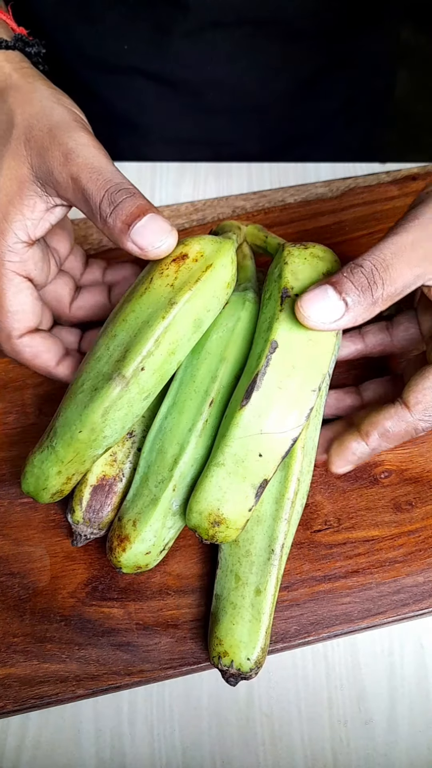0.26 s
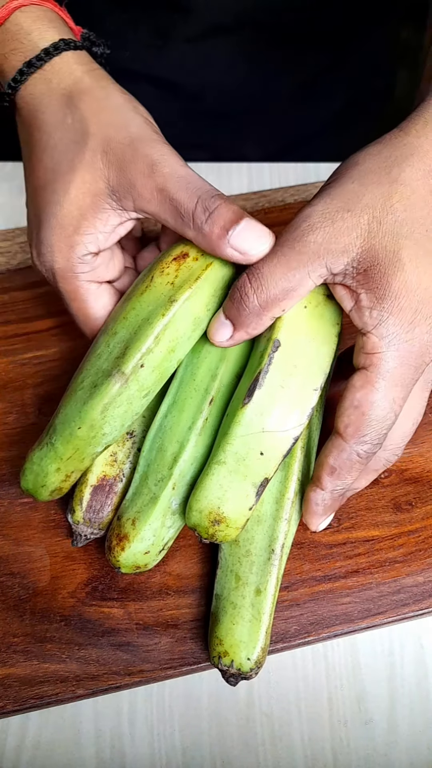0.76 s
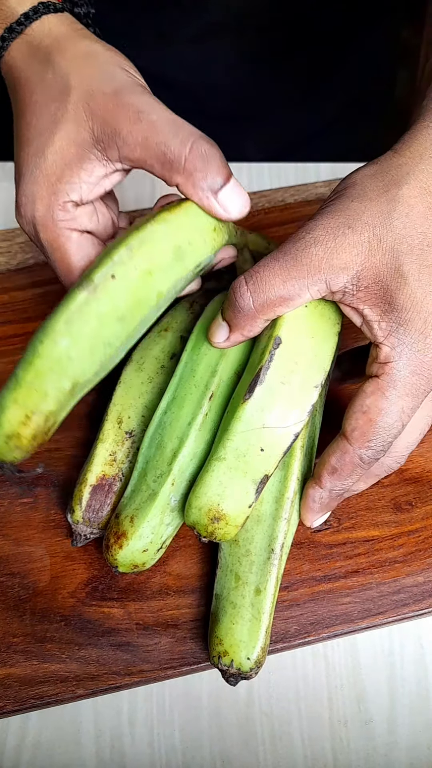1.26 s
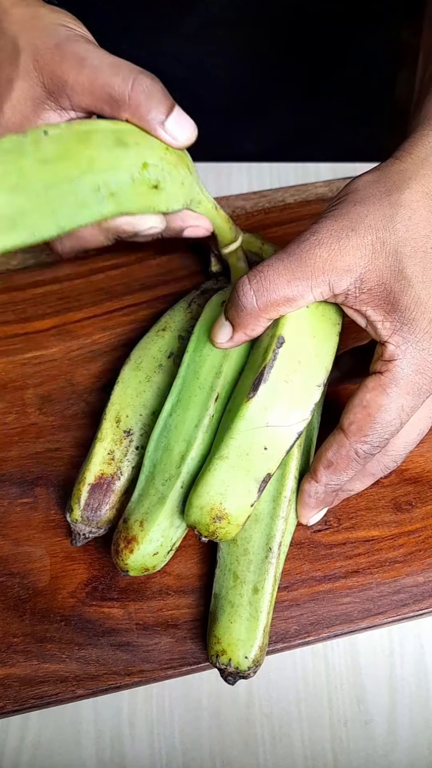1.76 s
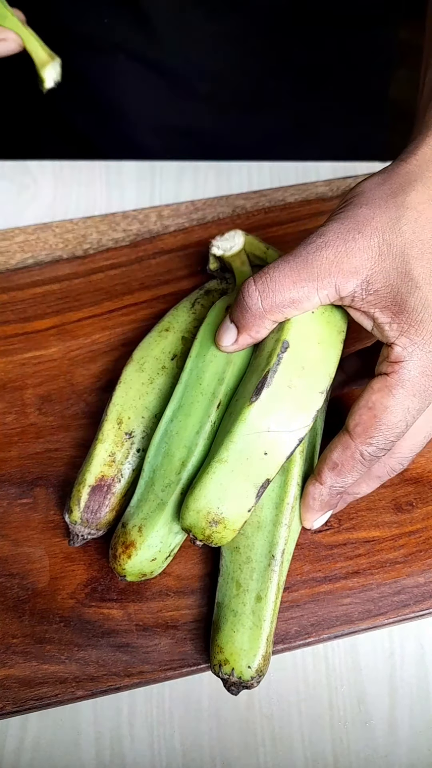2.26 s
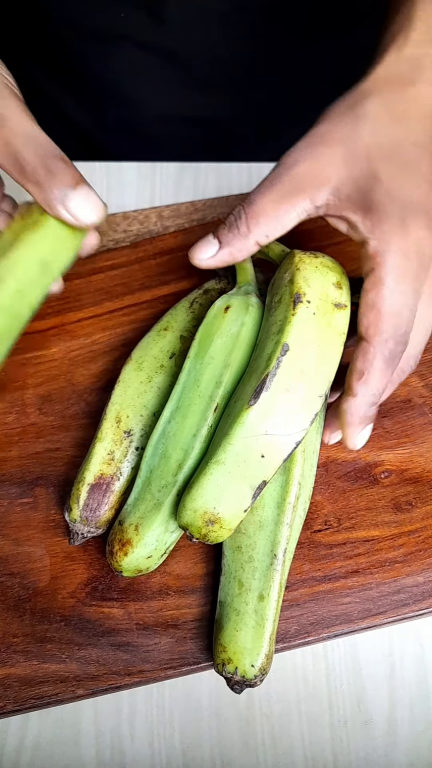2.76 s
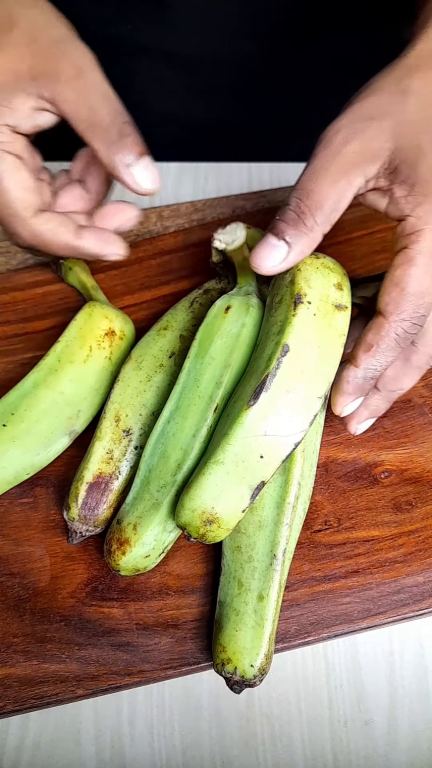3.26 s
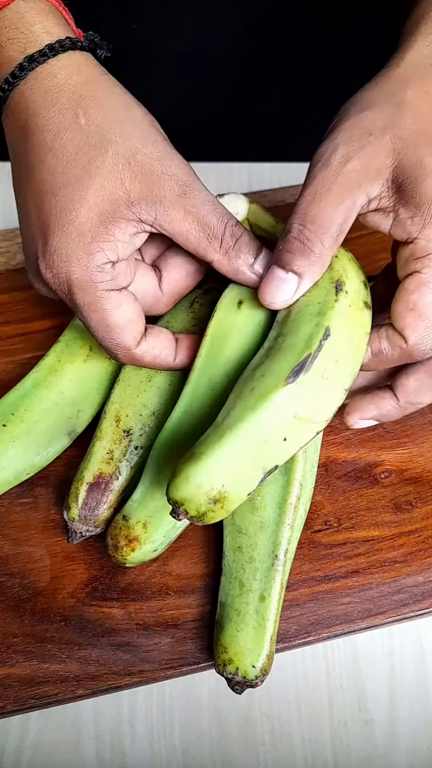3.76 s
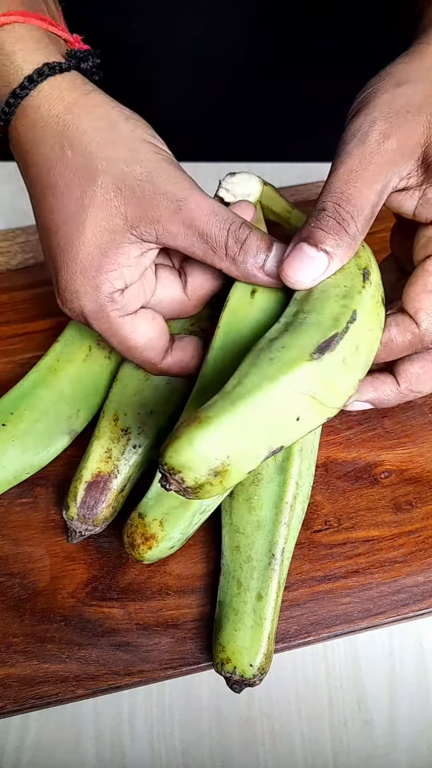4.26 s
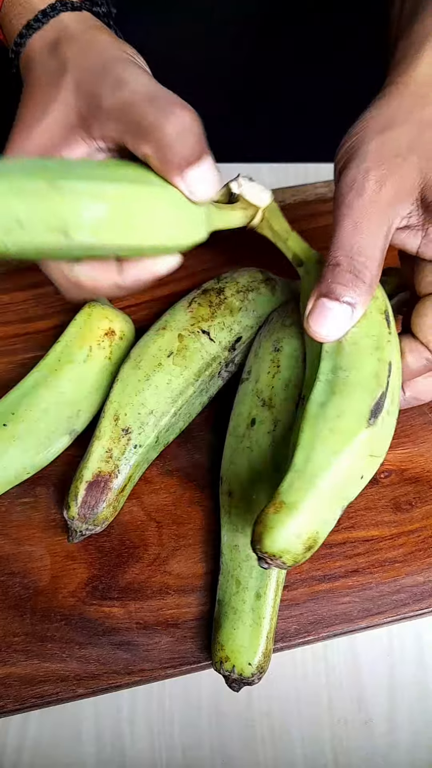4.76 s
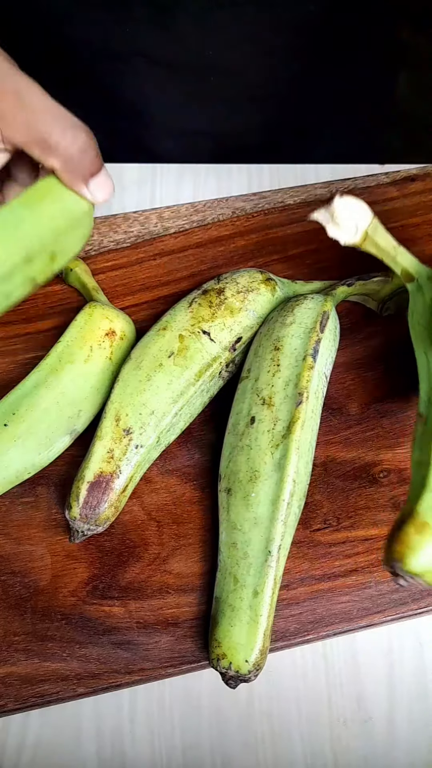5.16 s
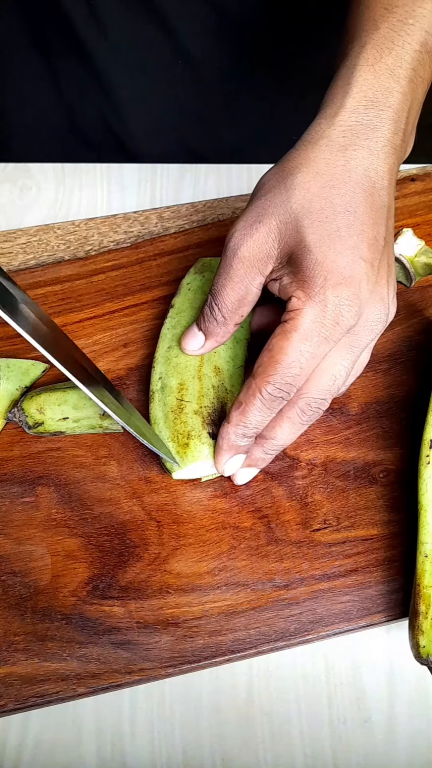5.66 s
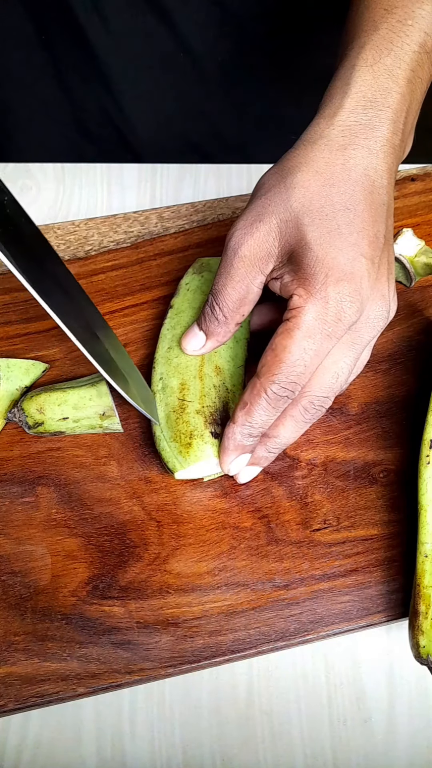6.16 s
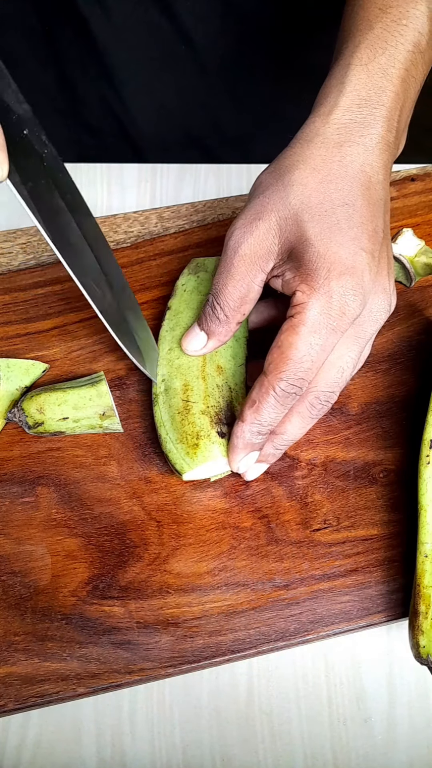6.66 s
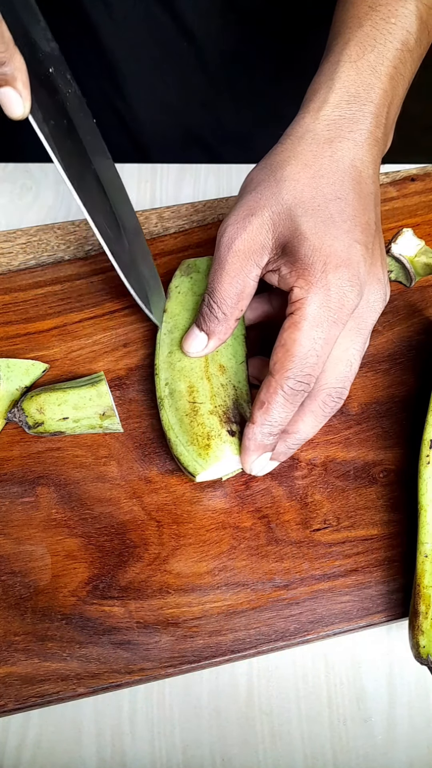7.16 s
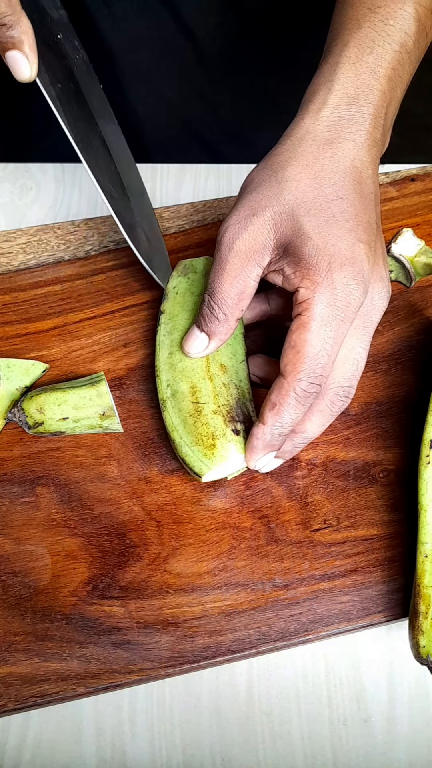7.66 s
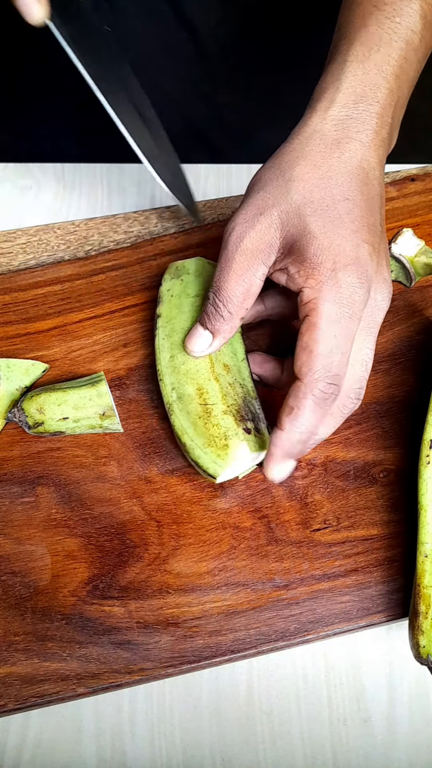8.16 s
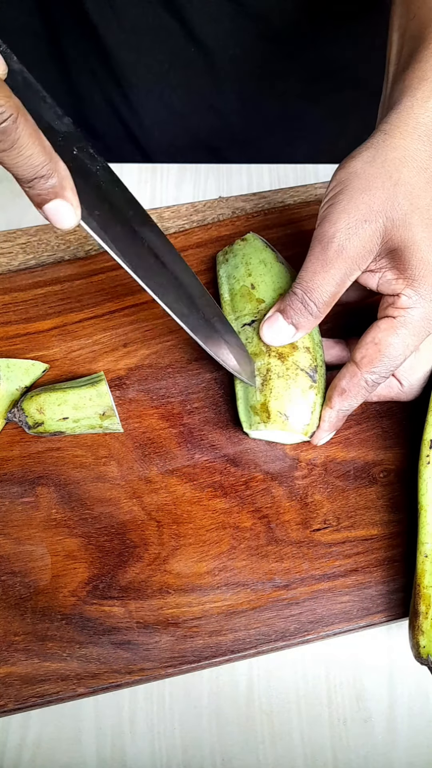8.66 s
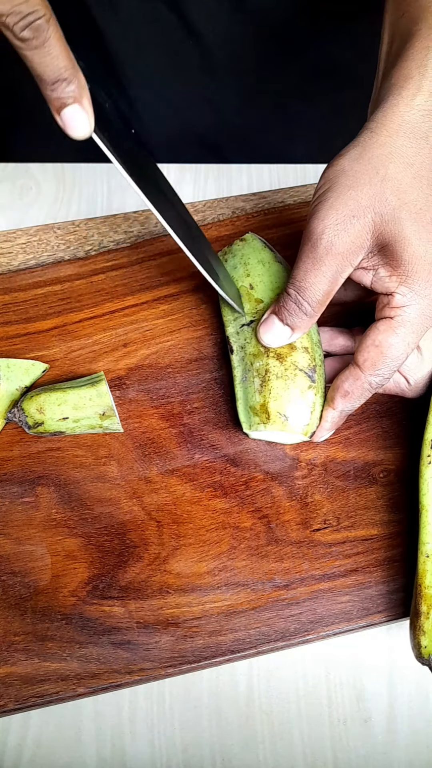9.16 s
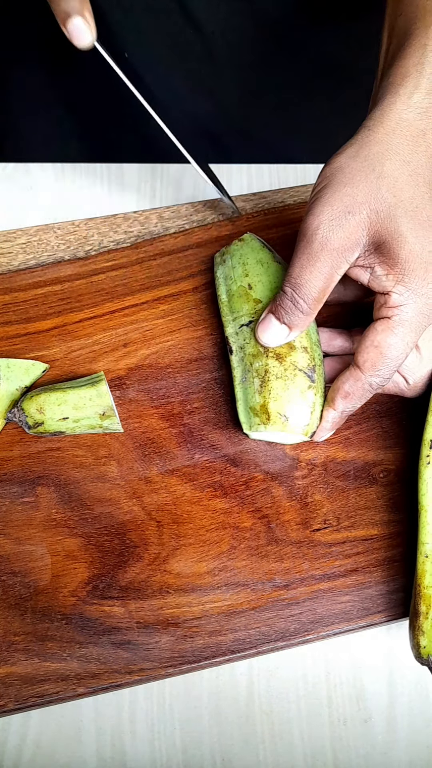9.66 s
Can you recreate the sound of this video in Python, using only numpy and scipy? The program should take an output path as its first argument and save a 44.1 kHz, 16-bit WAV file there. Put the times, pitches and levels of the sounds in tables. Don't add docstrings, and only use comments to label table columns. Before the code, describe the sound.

Close to a wooden board in a small kitchen with low street rumble, a green banana stalk cracks sharply, crackles faster and snaps free. The fruit lands with soft, boomy thuds. After a near-quiet gap a second stalk rips in a dense burst. Then a knife slits firm peel in irregular small crunchy slips, pauses, and bites in harder for a second cut. Two close microphone ports, short lively room tail.

```python
import sys
import numpy as np
from scipy import signal
from scipy.fft import rfft, irfft
from scipy.io import wavfile
from scipy.ndimage import uniform_filter1d

SR = 44100
rng = np.random.default_rng(int(sys.argv[2]) if len(sys.argv) > 2 else 0)


def generate_wav(sig):
    pcm = np.round(np.clip(np.atleast_2d(sig).T, -1, 1) * 32767).astype(np.int16)
    wavfile.write(sys.argv[1], SR, pcm)


def nominal_scale(level):
    x = np.asarray(level, float) / 20
    return 10 ** x


N = 437472


def evened(x):
    return x / np.sqrt(np.mean(x ** 2) + 1e-20)


def read_spectrum(points, hz):
    f, value = np.transpose(points)
    return np.interp(np.log(hz + 1), np.log(f + 1), value)


def level_curve(points):
    s, db = np.transpose(points)
    return nominal_scale(np.interp(np.arange(N) / SR, s, db, left=-150, right=-150))


def add(mix, s, sound):
    part = mix[:, round(s * SR):][:, :sound.shape[1]]
    part += sound[:, :part.shape[1]]


def shifting(x, responses, turn_s):
    place = np.arange(N) / SR / turn_s
    out = 0
    for k, response in enumerate(responses):
        away = abs((place - k + 1) % len(responses) - 1)
        window = np.cos(np.pi / 2 * np.minimum(away, 1))
        out = out + signal.oaconvolve(x * window, response, axes=1)[:, :N]
    return out


# (frequency [Hz], level [dB])
AIR_COLOUR = [(18, -46), (30, -24), (141, -4), (252, -13), (303, -19), (364, -19), (540, -26), (780, -26),
              (1190, -38), (1540, -38), (2290, -45), (6550, -52), (8740, -45), (14800, -51), (16000, -55)]
# (frequency [Hz], left-right likeness [-1 to 1])
PORT_LIKENESS = [(60, 0.9), (180, 0.91), (550, 0.45), (1650, 0.01), (4970, -0.02), (15000, -0.01)]


def air():
    frames, hz = N // 256 + 5, np.fft.rfftfreq(1024, 1 / SR)
    a, b, c, d, patches = rng.standard_normal((frames, 513, 5)).T
    patches = uniform_filter1d(patches, 12, 0)
    patches = evened(uniform_filter1d(patches, 30, 1))
    same = np.clip(read_spectrum(PORT_LIKENESS, hz), -1, 1)[:, None]
    left = a + 1j * b
    right = same * left + np.sqrt(1 - same ** 2) * (c + 1j * d)
    drift_db = 2.3 * patches
    z = np.array([left, right]) * nominal_scale(read_spectrum(AIR_COLOUR, hz)[:, None] + drift_db)
    return nominal_scale(-55) * evened(signal.istft(z, nperseg=1024, noverlap=768)[1][:, :N])


def resonate(x, modes):
    hz = np.fft.rfftfreq(N, 1 / SR)
    gain = sum(nominal_scale(db) / (1 + (2 * (hz - f) / width) ** 2) for f, width, db in modes)
    return irfft(rfft(x) * gain, N)


def rumble(gain, modes, apart):
    mid, side = (evened(resonate(noise, modes)) for noise in rng.standard_normal((2, N)))
    return gain * (mid + apart * side * [[1], [-1]]) * nominal_scale([[-.6], [.6]])


# (time [s], level [dB])
TRAFFIC = [(0, -55), (.7, -54), (1.15, -55.5), (1.5, -68), (1.9, -50), (2.7, -78), (2.95, -52.5),
           (3.4, -70), (3.75, -48.5), (4.45, -74), (4.8, -57.5), (5.2, -76), (6.3, -56), (7.3, -57.5),
           (8.45, -61.5), (9.1, -52), (9.35, -58.5), (9.92, -60.5)]
# (frequency [Hz], width [Hz], level [dB])
STREET_MODES = [(69.9, 5.5, 5.5), (47.7, 19, -18.5)]


def street():
    return rumble(level_curve(TRAFFIC), STREET_MODES, apart=.13)


def load(presses):
    rise_share, fade_db = 0.76, 24
    t = np.arange(0, N + 64, 64) / SR
    s, db, hold, hard_db = np.array(presses).T[..., None]
    press_db = db - fade_db * np.maximum((t - s) / hold, (s - t) / (rise_share * hold))
    strengths = []
    for part_db, resting_db in [(0, -68), (hard_db, -68 - 21.5)]:
        power = (nominal_scale(press_db + part_db) ** 2).sum(0) + nominal_scale(resting_db) ** 2
        strengths.append(np.interp(np.arange(N) / SR, t, np.sqrt(power)))
    return strengths


# (time [s], strength [dB], hold [s], hardness [dB])
PRESSES = [(.02, -52, 0.073, -10), (.66, -48, 0.21, -10), (1.0, -46.5, 0.24, -12), (1.53, -50, 0.54, -7),
           (2.03, -35.5, 0.37, -11.5), (2.55, -51.5, 0.24, -13.5), (2.93, -31.5, 0.06, -3.5),
           (3.06, -27.5, 0.24, -17), (4.8, -48.5, 0.43, -8), (5.52, -49, 0.18, -10),
           (5.87, -50, 0.93, -2.5), (6.21, -41.5, 0.17, -9), (6.44, -46.5, 0.19, -7.5),
           (6.63, -45, 0.4, -6.5), (6.95, -47, 0.68, -6.5), (7.4, -47.5, 0.99, -10),
           (8.09, -43, 0.64, -14.5), (8.62, -42, 0.18, -7), (9.1, -45.5, 1, -10.5),
           (9.47, -42.5, 0.51, -12.5)]
# (frequency [Hz], width [Hz], level [dB])
BOARD_MODES = [(124.8, 15, 0.5), (100, 16, -4.5), (165.5, 32, -12), (36.2, 24, -32)]
# (frequency [Hz], width [Hz], level [dB])
UPPER_MODES = [(237.7, 24.3, 2), (306, 110, -12), (353.3, 16, -7.5), (457.7, 20, -13)]


def board():
    soft, hard = load(PRESSES)
    return rumble(soft, BOARD_MODES, apart=.14) + rumble(hard, UPPER_MODES, apart=.4)


# (time [s], length [s], frequency [Hz], width
# [Hz], level [dB])
SWELLS = [(3.05, .17, 3650, 250, -70), (3.05, .2, 4400, 700, -72), (3.0, .2, 1400, 400, -66),
          (8.34, .12, 5050, 500, -76), (1.42, .008, 6300, 1500, -31), (1.422, .15, 5800, 2500, -53),
          (1.422, .09, 1400, 500, -58), (8.39, .14, 4400, 1200, -74), (5.57, .16, 4000, 500, -72),
          (2.3, .1, 3200, 1800, -75), (2.299, .012, 3300, 600, -62), (1.924, .022, 800, 300, -46),
          (1.93, .02, 480, 150, -48), (3.91, .06, 4200, 1200, -73), (.47, .22, 580, 30, -61),
          (7.92, .12, 452, 12, -59), (7.08, .08, 650, 40, -65), (2.91, .17, 900, 800, -60),
          (1.95, .15, 800, 300, -62), (7.47, .12, 5000, 600, -80), (6.28, .2, 3800, 500, -72)]


def swells():
    out = np.zeros((2, N))
    for (s, length, hz, width, db), noise in zip(SWELLS, rng.standard_normal((len(SWELLS), 2, 16000))):
        n, r = min(round(length * SR), 16000), np.exp(-np.pi * width / SR)
        turn = np.exp(2j * np.pi * hz * np.arange(n) / SR)
        hiss = (turn * signal.lfilter([1], [1, -2 * r, r * r], noise[:, :n] / turn)).real
        add(out, s, nominal_scale(db) * evened(hiss) * np.sqrt(np.hanning(n)))
    return out


# (time [s], peak level [dB])
THUDS = [
    (1.422, -45.5),
    (1.93, -34.5),
    (2.871, -41),
    (2.921, -34.5),
    (2.999, -31.5),
    (4.646, -56),
    (4.861, -36),
    (5.46, -55.5),
    (5.787, -38.5),
    (8.586, -44),
]
# (frequency [Hz], level [dB], decay by 60 dB [s])
WOOD_MODES = [(228.2, -1, .1), (347, 0, 0.072), (354, -5.5, 0.06), (505.5, -3, 0.091), (608, -2, 0.047)]


def thuds():
    t, out = np.arange(8000) / SR, np.zeros((1, N))
    for s, db in THUDS:
        ring = 0
        for f, mode_db, t60 in WOOD_MODES:
            struck_hz = f * rng.uniform(0.937, 1.047)
            ring = ring + nominal_scale(mode_db - 60 * t / t60) * np.sin(2 * np.pi * struck_hz * t)
        ring *= 1 - np.exp(-t / 0.0026)
        add(out, s, nominal_scale(db) * ring[None] / abs(ring).max())
    return out * nominal_scale([[-1.5], [1.5]])


# (frequency [Hz], decay by 60 dB [s])
KITCHEN_DECAY = [(250, 0.2), (660, 0.62), (1740, 0.5), (4590, 0.5), (12100, 0.33)]


def kitchen(x):
    n = SR // 2
    taps = np.zeros((6, n))
    at = np.arange(70, n - 20, 10) + rng.integers(0, 10, (6, (n - 81) // 10))
    np.put_along_axis(taps, at, rng.choice([-1., 1.], at.shape), 1)
    taps *= nominal_scale(4.5 * np.exp(-np.arange(n) / SR / 0.00601))
    hz, t, z = signal.stft(taps, SR, nperseg=256)
    decay = nominal_scale(-60 * t / read_spectrum(KITCHEN_DECAY, hz)[:, None])
    tail = signal.istft(z * decay, SR, nperseg=256)[1]
    return shifting(x, tail.reshape(3, 2, -1) / np.linalg.norm(tail[0]), turn_s=0.016)


def ports(x, lag, bounce, bounce_s):
    t = np.arange(300) / SR
    taps = bounce * rng.standard_normal((9, 2, 300)) * (rng.random((9, 2, 300)) < .15) * np.exp(-t / bounce_s)
    taps[..., 0] = 1
    late = np.round(lag * rng.permutation(np.linspace(.1, 1.9, num=9))).astype(int)
    responses = []
    for (left, right), delay in zip(taps, late):
        pair = np.array([left, np.roll(right, delay)])
        responses.append(pair / np.linalg.norm(pair, axis=1, keepdims=True))
    return shifting(x, responses, turn_s=.009)


def causal(db):
    log_gain = np.log(nominal_scale(np.maximum(np.r_[db, db[-2:0:-1]], -100)))
    taps = np.fft.ifft(np.exp(log_gain - 1j * signal.hilbert(log_gain).imag)).real[:1024]
    return taps / np.linalg.norm(taps)


def fruit_rings(colour, peaks, split_hz):
    hz = np.fft.rfftfreq(2048, 1 / SR)
    peaks_db = sum(db / (1 + (2 * (hz - f) / width) ** 2) for f, width, db in peaks)
    response = causal(read_spectrum(colour, hz) + peaks_db)
    whole = rfft(np.r_[np.zeros(64), response], 2048)
    dull, below_top = (1 / (1 + (hz / f) ** 12) for f in split_hz)
    shares = (dull, below_top - dull, 1 - below_top)
    return [evened(irfft(whole * share)) / np.sqrt(2048) for share in shares]


def grains(shape, per_s, spread_db):
    size = nominal_scale(spread_db * np.minimum(rng.exponential(1, shape), 4)) * rng.choice([-1., 1.], shape)
    return size * (rng.random(shape) < per_s / SR)


def crackle(events, fizz_curves, rings, per_s, spread_db, snap_s, rise, fade, fizz_db, trim_db):
    t, sides = np.arange(4000) / SR, np.array([[.5], [-.5]])
    runs = grains((len(events), 4000), per_s, spread_db)
    fizz = evened(grains(N, per_s, spread_db)) * sum(level_curve(c) for c in fizz_curves)
    drive = np.repeat(nominal_scale(np.array(fizz_db))[:, None], 2, axis=0) * fizz
    for (s, db, pan_db, dull_db, length, top_db), run in zip(events, runs):
        run = run * np.exp(-np.maximum(t - length, 0) / (fade * length))
        run = run / (abs(run[t < length + .001]).max() + 1)
        run = run * np.minimum(t / (rise * length), 1)
        run[0] = min(snap_s / length, 4.5)
        part_db = np.vstack([sides * pan_db + part for part in (dull_db, 0, top_db)])
        add(drive, s - .5 * rise * length, run * nominal_scale(db + trim_db + part_db))
    out = 0
    for k, ring in enumerate(rings):
        out = out + signal.oaconvolve(drive[2 * k:2 * k + 2], ring[None, :1100], axes=1)[:, 64:N + 64]
    return out


def with_top(rows, top_curve):
    return [(*row, np.interp(row[0], *np.transpose(top_curve))) for row in rows]


def placed(rows, pan_db):
    scatter_db = 4
    return [(s, db, pan_db + scatter_db * rng.standard_normal(), *rest) for s, db, *rest in rows]


# (time [s], peak level [dB], dull part [dB], length [s])
SCUFFS = [(2.8472, -59, -28, 0.017), (2.8704, -54.5, -19, 0.017), (2.917, -45, 3.5, 0.025),
          (2.95, -54.5, 6.5, 0.041), (3.0004, -50.5, 10.5, 0.011), (3.02, -61, 7, 0.026),
          (3.4777, -66.5, 3, 0.024), (3.6677, -72, 6.5, 0.028), (3.914, -64.5, -13, 0.01),
          (4.165, -63.5, -10.5, 0.024), (4.188, -66, 5, 0.027)]
# (time [s], peak level [dB], dull part [dB], length [s])
JERKS = [(5.5784, -70, -1, 0.044), (5.6246, -41.5, -5, 0.0073), (5.7825, -35.5, -7, 0.026),
         (5.8294, -63.5, 13, 0.023), (5.99, -53.5, -7, 0.018), (6.0194, -44.5, -8.5, 0.011),
         (6.1145, -58.5, -21, 0.035), (6.1477, -49.5, -9, 0.029), (6.1706, -50.5, -6, 0.036),
         (6.224, -44, -9, 0.022), (6.25, -58.5, 4, 0.038), (6.3996, -59.5, -7, 0.052),
         (6.4507, -52.5, -6, 0.0095), (6.4842, -53.5, -1, 0.019), (6.575, -56.5, -2, 0.02),
         (6.5949, -51, -1, 0.017), (6.633, -45.5, -0.5, 0.0098), (6.643, -41, -10, 0.013),
         (6.6787, -49.5, 1.5, 0.018), (6.7, -71, 2.5, 0.019), (6.8201, -48.5, -6.5, 0.031),
         (6.865, -54.5, -15, 0.038), (6.9019, -43.5, -2.5, 0.025), (6.932, -50, 1.5, 0.02),
         (7.011, -45.5, -4, 0.038), (7.045, -54.5, 0, .045), (7.217, -53, -0.5, 0.017),
         (7.2276, -46, 0, 0.02), (7.2491, -48, 3.5, 0.015), (7.268, -60.5, 7.5, .035),
         (7.3894, -66, 5, 0.037), (7.6982, -62.5, 6, 0.03), (7.7368, -55.5, 4, 0.011),
         (7.9838, -63, -1.5, 0.012), (8.032, -50.5, 0.5, 0.015), (8.052, -61, 0, 0.044)]
# (time [s], peak level [dB], length [s])
DRAWS = [(8.563, -48.5, 0.014), (8.584, -32.5, 0.0056), (8.599, -32.5, 0.012), (8.61, -31, 0.011),
         (8.623, -37, 0.0094), (8.633, -35.5, .013), (8.653, -61, 0.019), (8.844, -50.5, 0.051),
         (8.933, -44.5, 0.037), (8.973, -48, 0.034), (9.0405, -47, 0.0085), (9.073, -46, 0.008),
         (9.1, -51, 0.025), (9.118, -50, 0.052), (9.176, -37.5, 0.007), (9.188, -51, 0.02),
         (9.212, -40, 0.028), (9.296, -39.5, 0.021), (9.3423, -41, 0.0082), (9.385, -47.5, .03),
         (9.457, -53, 0.01), (9.458, -43.5, 0.021), (9.519, -45.5, 0.013), (9.536, -57, 0.034),
         (9.59, -53, 0.033)]
# (time [s], peak level [dB], left-right [dB], dull part [dB])
TICKS = [(0.546, -46, 2, -1), (3.001, -50, 5, 10), (2.303, -62, -10, -12), (5.4591, -56.5, 6, 5),
         (5.579, -60.5, -1, -19), (7.6995, -59.5, -2, -11.5), (8.0338, -49, -4, -1.5),
         (5.957, -52, -5, -16), (6.019, -40.5, -6, -7), (6.1494, -46.5, -11, -20), (6.2256, -39, -2.5, -30),
         (8.504, -50.5, -2, -4), (8.5835, -34.5, 3, -11), (8.5986, -32, -1, -1.5), (8.588, -54, -2, -15),
         (9.213, -40, -10, -16)]
# (time [s], level [dB])
SAWING = [
    [(2.82, -104), (2.9, -70), (3.01, -69), (3.25, -113)],
    [(5.45, -99), (5.85, -70), (6.05, -112), (6.46, -68.5), (6.71, -99), (6.82, -72), (7.35, -76),
     (7.7, -85.5), (8.4, -88)],
    [(8.4, -96.5), (8.568, -80), (8.738, -80), (9.178, -60.5), (9.362, -58.5), (9.618, -67.5),
     (9.75, -104.5)],
]
# (time [s], highest part [dB])
PEEL_TOP = [
    (7, -1),
    (7.9, 5),
    (8.5, -4.5),
]
# (frequency [Hz], level [dB])
PEEL_COLOUR = [(290, -27), (500, -1.5), (718, -4), (868, -7), (974, -6.5), (1510, -3.5), (1770, -8),
               (2280, -8), (2930, -10.5), (3920, -10), (4700, -11.5), (6000, -14), (7200, -11),
               (8210, -9.5), (9490, -22.5), (14000, -24), (16000, -25)]
# (frequency [Hz], width [Hz], height above the colour [dB])
PEEL_RINGS = [(979, 68, 6.5), (1480, 27, 6.5), (2194, 50, 6), (2537, 33, 7), (2950, 90, 4),
              (3757, 140, 2.5), (4013, 95, 3.5), (5950, 400, 1), (7980, 220, -7)]


def blade_on_peel():
    draws = [(s, db, -1.8, length) for s, db, length in DRAWS]
    slips = placed(SCUFFS, pan_db=-2) + placed(JERKS, pan_db=-1.5) + placed(draws, pan_db=0.5)
    ticks = [(*row, 0.0016) for row in TICKS]
    rings = fruit_rings(PEEL_COLOUR, PEEL_RINGS, split_hz=(1900, 10500))
    return crackle(with_top(slips + ticks, PEEL_TOP), SAWING, rings, per_s=14000, spread_db=2.0,
                   snap_s=0.00296, rise=.15, fade=.25, fizz_db=(1.5, -1.5, -6), trim_db=4.5)


# (time [s], peak level [dB], left-right [dB], dull part [dB])
FIRST_STALK = [(1.206, -51.5, -8.5, -12), (1.228, -48.5, -4, -5.5), (1.2577, -36.5, 3.5, -18.5),
               (1.3284, -46.5, 10.5, -26.5), (1.3457, -39.5, -1.5, -19.5), (1.375, -27, -1, -18.5),
               (1.4206, 4, 4, -13.5), (1.429, -29.5, -3, -27), (1.517, -35, 3, -32),
               (1.535, -35.5, -2, -31.5), (1.577, -37.5, 2.5, -25.5), (1.608, -33.5, 1, -28),
               (1.6796, -35.5, -1, -21), (1.687, -39.5, -3, -25), (1.698, -29.5, -3, -10),
               (1.713, -14, 4.5, -15), (1.7173, -15.5, 0, -13.5), (1.757, -32, -5.5, -26),
               (1.7649, -17, 2, -15), (1.7915, -12, 1.5, -10.5), (1.8125, -27, -1.5, -18),
               (1.8343, -26, 2.5, -22.5), (1.861, -33.5, 0, -24), (1.866, -36.5, 1, -21),
               (1.8843, -22.5, 3, -29.5), (1.893, -22.5, 0.5, -30), (1.9008, -27, 4, -39.5),
               (1.9092, -13, 0.5, -29.5), (1.924, -25, 2.5, -21.5), (1.927, -29, -3.5, -21.5),
               (1.9297, -10, -3, -16), (1.931, -6, 2.5, -17.5), (1.9334, -10.5, -0.5, -20.5),
               (1.935, -3.5, -2, -21), (1.9353, -5, -0.5, -1.5), (1.9375, -6.5, -1, -22.5),
               (1.938, -10, -3.5, -18.5), (1.9401, -11.5, -2, -18.5)]
# (time [s], peak level [dB], left-right [dB], dull part [dB])
SECOND_STALK = [(4.5164, -46, 5, -21.5), (4.525, -38, -6, -16), (4.538, -35.5, -1, -12.5),
                (4.596, -43, 0, -19.5), (4.613, -32.5, 3.5, -20), (4.648, -8, -1, -12),
                (4.6663, -14.5, -4, -16), (4.678, -26.5, -0.5, -12), (4.6925, -15, -6, -10.5),
                (4.7095, -23.5, -4, -2.5), (4.7245, -38.5, -0.5, -20), (4.738, -35, -1, -5),
                (4.7522, -23.5, -3.5, -13), (4.7558, -13.5, -3, -11.5), (4.774, -29.5, -0.5, -13),
                (4.7798, -14, -2, -6), (4.8054, -26, 0.5, -28), (4.8113, -31, 3, -22),
                (4.815, -28.5, 0, -25), (4.8202, -29.5, 0, -19.5), (4.827, -18, -2, -13),
                (4.829, -19, 5, -21), (4.831, -15, 3, -14), (4.8347, -14.5, 0.5, -28),
                (4.8355, -12.5, 0, -10), (4.841, -25, -5, -5), (4.858, -32, -1, -8),
                (4.87, -21.5, -23, -14), (4.8746, -17.5, -3.5, -10), (4.882, -26, -7, 9.5)]
# (time [s], peak level [dB], left-right [dB], dull part [dB], crackle length [s])
RIPS = [
    (1.424, -10, 0, -14, .01),
    (1.9313, 0.6, 0, -18, 0.007),
    (4.7952, -25, 2.3, -23, 0.016),
    (4.824, -6, 3, -13.5, 0.012),
    (4.842, -11, -1.5, -6, 0.025),
    (4.867, -7, -0.5, -6, 0.015),
    (4.885, -19, 0, -5, .025),
]
# (time [s], level [dB])
TEARING = [
    [(1.15, -86), (1.4, -76.5), (1.45, -49), (1.67, -73), (1.72, -60), (1.87, -57), (1.92, -44.5),
     (1.98, -56.5)],
    [(4.45, -85), (4.63, -89), (4.66, -47), (4.79, -55), (4.83, -40.5), (4.93, -60)],
]
# (time [s], level [dB])
STALK_TOP = [
    (1.37, 1.5),
    (1.42, -23),
    (1.5, 3.5),
    (1.9, 4.5),
    (4.6, -3.5),
    (4.67, 3),
    (4.85, 7.5),
]
# (frequency [Hz], level [dB per Hz])
STALK_COLOUR = [(400, -20), (620, -14), (950, -12), (1290, -11), (2660, -12), (4310, -13), (5400, -16),
                (6600, -17), (8860, -10), (10500, -11.5), (12800, 5.5), (14900, 9.5), (16000, -0.5)]
# (frequency [Hz], width [Hz], height above the colour [dB])
STALK_RINGS = [(784, 330, 2.6), (1420, 240, 0.66), (3430, 298, 0.7), (6036, 240, 0.86), (7960, 2700, 4.2)]


def stalks_tearing():
    snaps = [(*row, .0014) for row in FIRST_STALK + SECOND_STALK]
    rings = fruit_rings(STALK_COLOUR, STALK_RINGS, split_hz=(5200, 10500))
    return crackle(with_top(snaps + RIPS, STALK_TOP), TEARING, rings, per_s=6000, spread_db=3.8,
                   snap_s=.0045, rise=.45, fade=0.49, fizz_db=(-12, -1.5, 1.5), trim_db=-9.5)


def scene():
    stalks, blade, wood = stalks_tearing(), blade_on_peel(), thuds()
    near = ports(stalks + blade, lag=13, bounce=.27, bounce_s=.0008) + wood
    into_room = nominal_scale(-8) * stalks + nominal_scale(-6.0) * blade + nominal_scale(1.0) * wood
    return near + kitchen(into_room) + swells() + board() + street() + air()


def top_cut(x):
    return signal.sosfilt(signal.butter(12, 16800, fs=SR, output="sos"), x)


def record(dry):
    low = signal.oaconvolve(dry, signal.firwin(511, 15800, fs=SR)[None], "same", axes=1)
    top = dry - low
    power = (top ** 2).mean(0)
    sudden = uniform_filter1d(power, 128) > 8 * uniform_filter1d(power, 2048)
    mix = low + uniform_filter1d(1. * sudden, 256) * top
    return top_cut(np.clip(mix, -.995, .995))


dry = scene()
out = record(dry)
generate_wav(out)
```